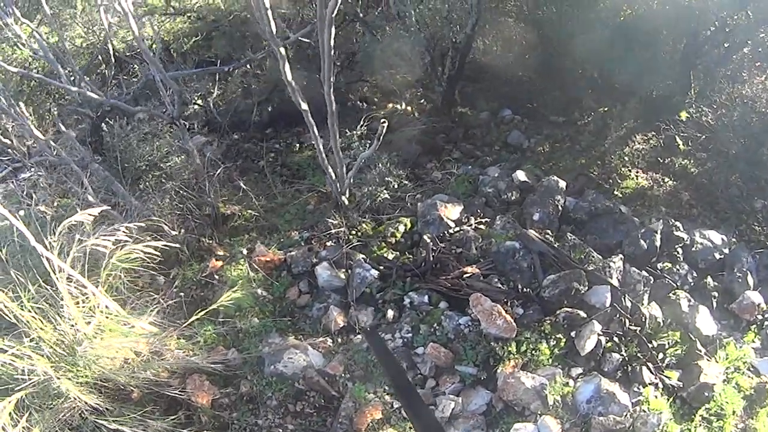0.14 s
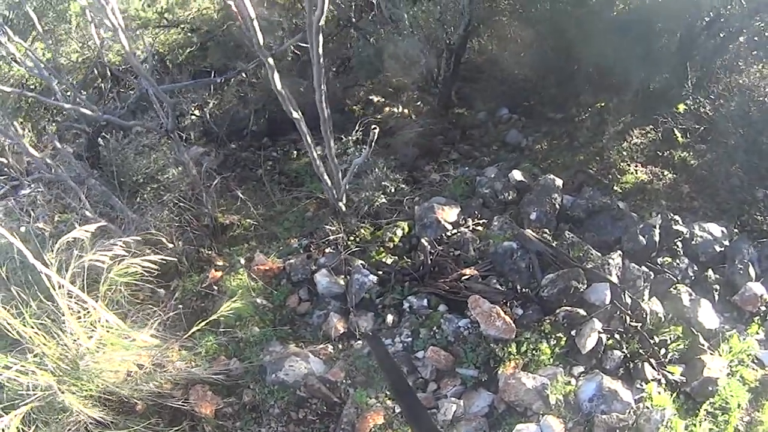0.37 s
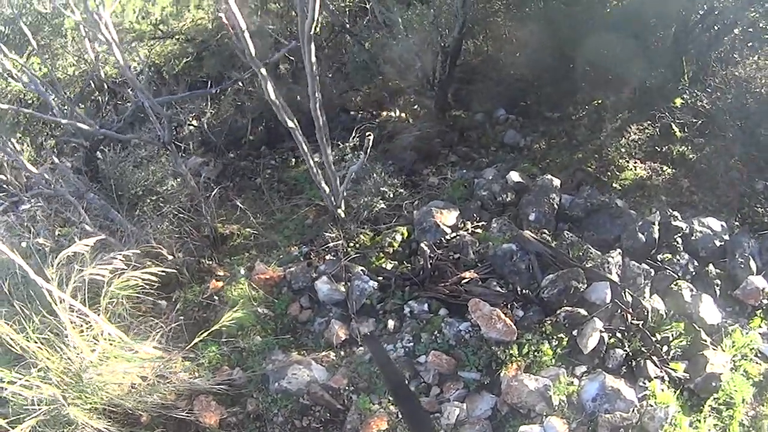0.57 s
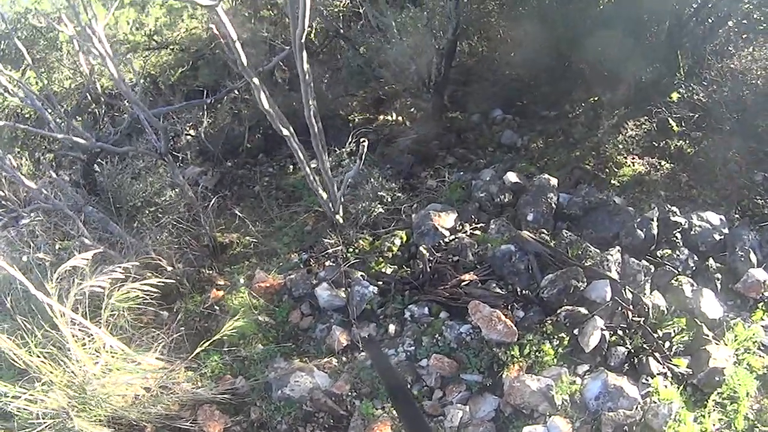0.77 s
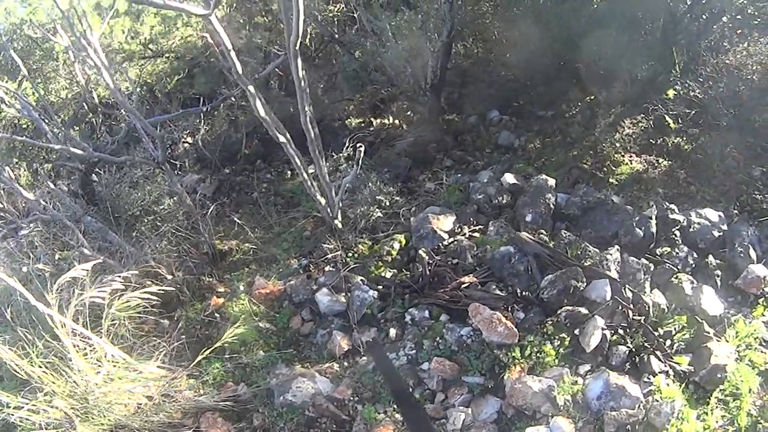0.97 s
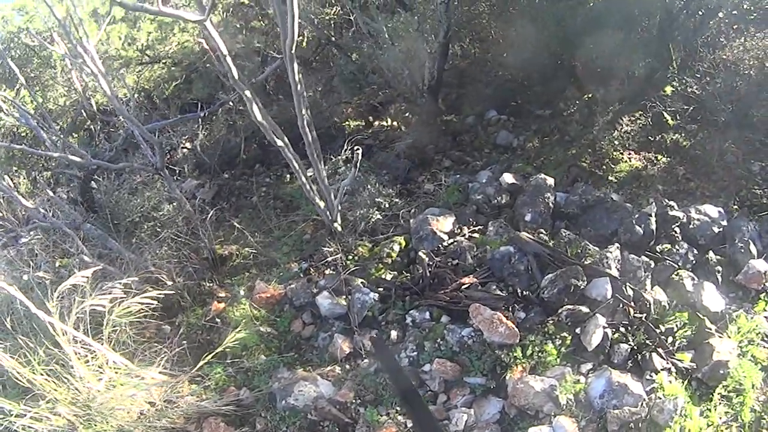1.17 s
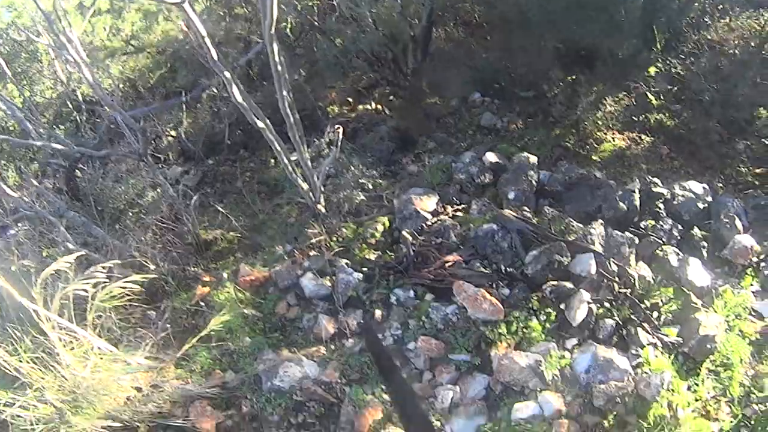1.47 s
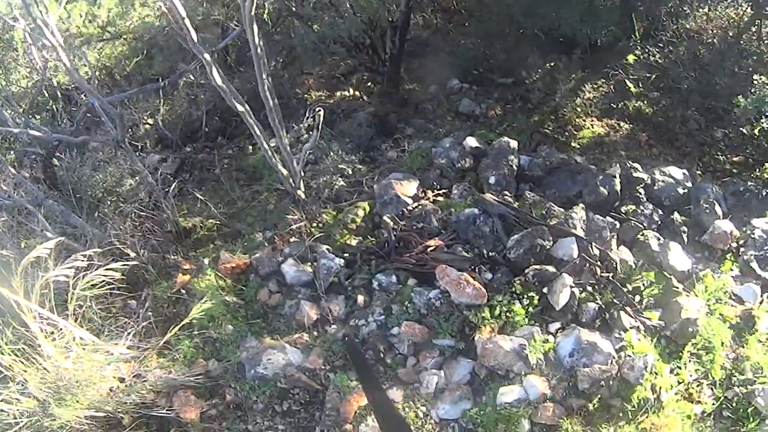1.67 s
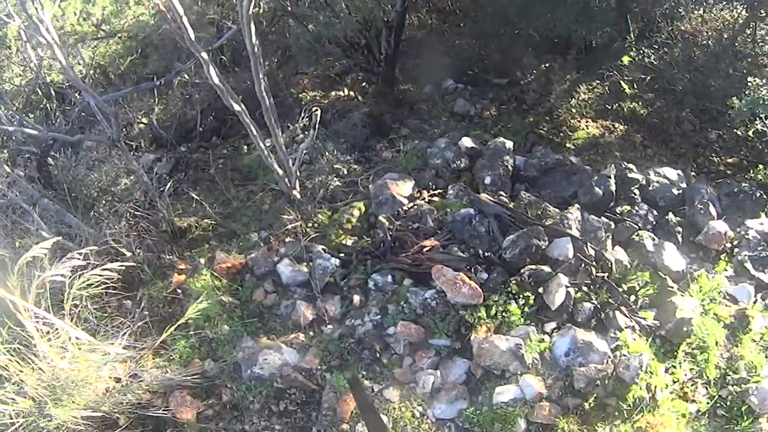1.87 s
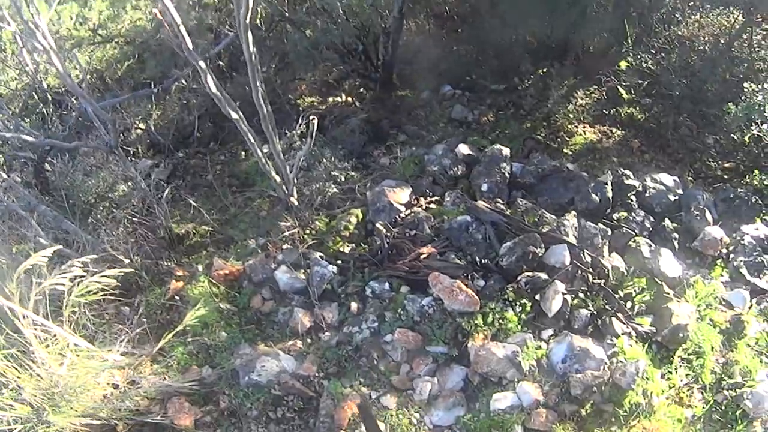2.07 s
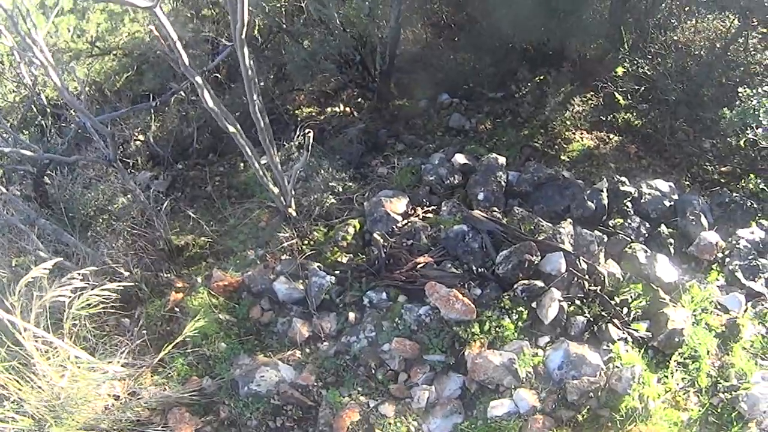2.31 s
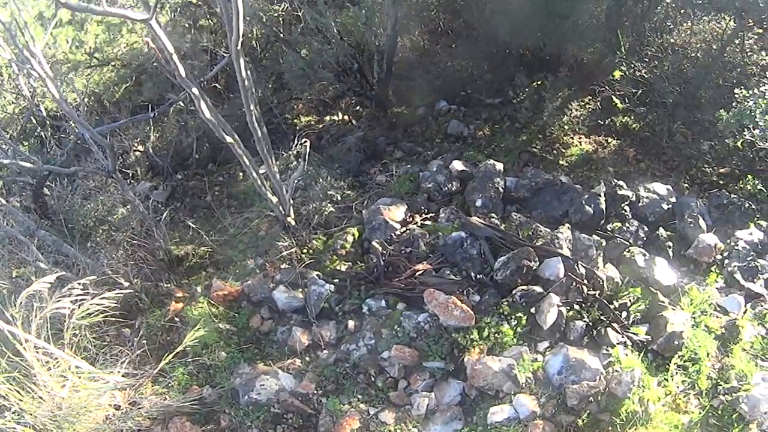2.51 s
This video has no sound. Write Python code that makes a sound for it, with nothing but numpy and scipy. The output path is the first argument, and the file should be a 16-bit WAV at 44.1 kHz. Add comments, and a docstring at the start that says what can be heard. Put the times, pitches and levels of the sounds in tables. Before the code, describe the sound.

Three short, raspy squeals from a young wild boar moving through dry brush outdoors.

```python
"""Young wild boar in dry brush

A few metres away on a stony slope, a young boar squeals three times: jittery harmonics and rasp,
shaped by its throat. Each squeal sags in pitch; two break into a higher, rasping register.
As it moves, twigs snap, stones clack, dry leaves rustle and two hoof steps thud softly.
Rocks and bushes scatter short reflections, over a quiet outdoor hush."""
import sys
import numpy as np
from scipy import signal
from scipy.fft import rfft, irfft
from scipy.io import wavfile

SR = 44100
rng = np.random.default_rng(int(sys.argv[2]) if len(sys.argv) > 2 else 0)


def wrap_up_sound(samples):
    """Save the sound to the file named by the first command line argument, as 16-bit audio."""
    columns = np.atleast_2d(samples).T
    # keep every value between -1 and 1, then stretch to whole-number steps
    tamed = np.clip(columns, -1, 1)
    steps = np.round(tamed * 32767).astype(np.int16)
    wavfile.write(sys.argv[1], SR, steps)


N = 116865


def amp(db):
    """Decibels to linear gain."""
    return 10 ** (np.asarray(db) / 20)


def unit(x):
    """Scales to rms 1."""
    return x / np.sqrt(np.mean(x ** 2) + 1e-20)


def read(points, hz):
    """Reads a table on a log-frequency axis."""
    table_hz, value = np.transpose(points)
    return np.interp(np.log(hz + 1), np.log(table_hz + 1), value)


def add(mix, start_s, sound):
    """Drops a sound into the mix at its cue."""
    part = mix[max(round(start_s * SR), 0):][:len(sound)]
    part += sound[:len(part)]


def noise_band(size, centre_hz, width_hz):
    """Noise through one steep resonance, at rms 1."""
    hz = np.fft.rfftfreq(SR, 1 / SR)
    rolloff = 1 + (2 * (hz - centre_hz) / width_hz) ** 4
    return unit(irfft(rfft(rng.standard_normal(SR)) / rolloff)[:size])


def colour(points, pitch=1):
    """An EQ curve as gains of unit power, transposed by a pitch ratio."""
    hz = abs(np.fft.fftfreq(2048, 1 / SR))
    return unit(amp(read(points, hz / pitch)))


def click(gain):
    """The tightest click with this spectrum: a minimum-phase impulse."""
    log_spectrum = np.conj(signal.hilbert(np.log(gain + 1e-9)))
    return np.fft.ifft(np.exp(log_spectrum)).real[:len(gain) // 2]


def hush():
    """A steady bed of outdoor air, wide in the mids and nearly mono in the bass."""
    # tone of the air (frequency [Hz], level [dB])
    air_eq = [(15, -17), (25, -3.5), (149, -4.5), (444, -2.5), (651, -4.5), (759, -5.5), (819, -8),
              (1140, -6), (1550, -8), (1670, -7.5), (3240, -12.5), (3590, -11.5), (5530, -13), (8750, -14),
              (11000, -18.5), (14300, -80), (22000, -120)]
    # left-right likeness (frequency [Hz], correlation [-1 to 1])
    likeness = [(30, 1), (80, 0.67), (170, 0.56), (350, -.25), (700, 0), (1500, 0), (4000, 0),
                (10000, 0.38)]
    hz = np.fft.rfftfreq(N, 1 / SR)
    left, independent = rfft(rng.standard_normal((2, N))) * amp(read(air_eq, hz))
    correlation = np.clip(read(likeness, hz), -1, 1)
    right = correlation * left + np.sqrt(1 - correlation ** 2) * independent
    return amp(-58.5) * unit(irfft(np.array([left, right]), N))


def rustle():
    """Dry leaves: tiny clicks of uneven size and a noise wash, swelling as the animal moves."""
    # fader ride of the rustle (time [s], level [dB])
    ride = [(0, -46.5), (.1, -49), (.16, -48), (.26, -48.5), (.34, -52.5), (.43, -56.5), (.47, -47),
            (.56, -43.5), (.62, -51), (.69, -54.5), (.79, -55.5), (.87, -53), (.97, -49), (1.04, -53.5),
            (1.09, -49.5), (1.21, -53.5), (1.3, -59), (1.4, -63), (1.47, -52.5), (1.68, -60),
            (1.772, -58.5), (1.86, -53), (1.97, -67), (2.05, -62.5), (2.11, -54), (2.17, -60.5),
            (2.42, -61), (2.55, -59), (2.65, -71)]
    # tone of the leaves (frequency [Hz], level [dB])
    leaf_eq = [(290, -36), (500, -35.5), (599, -14.5), (700, -41.5), (817, -7.5), (918, -23), (1250, -9.5),
               (1340, -12.5), (2390, -12.5), (2720, -1), (2900, 1), (4120, -7), (4570, -1.5), (6730, -8),
               (8060, -3.5), (9920, -11), (11000, -21), (14300, -82), (22000, -120)]
    grains_per_s, spread_db, wash_db = 1800, 3.5, 0.5
    grains = (rng.random(N) < grains_per_s / SR) * rng.choice([-1, 1], N)
    sizes = amp(spread_db * np.minimum(rng.exponential(1, N), 4.5))
    drive = unit(grains * sizes) + amp(wash_db) * rng.standard_normal(N)
    leaves = unit(signal.fftconvolve(drive, click(colour(leaf_eq)))[:N])
    return leaves * amp(np.interp(np.arange(N) / SR, *np.transpose(ride)))


def thud(level_db):
    """A hoof presses into the soil: a short, dull puff."""
    attack_s = 0.0013
    age = np.arange(SR // 25) / SR / attack_s
    return amp(level_db) * age * np.exp(1 - age) * noise_band(len(age), centre_hz=530, width_hz=690)


def crack(knock_db, ring_db, snap_db, splinter_s, pitch):
    """A twig or stone: one impact and brief splintering excite a dull knock, a ring and a bright snap."""
    # tones of the three layers (frequency [Hz], level [dB])
    knock_eq = [(100, -21), (500, -21), (750, -11.5), (1000, -0.5), (1450, 3.5), (2000, -3.5), (3000, 2),
                (6000, -25)]
    ring_eq = [(500, -87), (1800, -20), (2350, -19), (2750, 4.5), (3000, 9), (3350, -2), (4000, -11),
               (6000, -21), (11000, -67)]
    snap_eq = [(500, -68), (1700, -38), (2300, -31), (3100, -2.5), (4000, -4), (4900, 5.5), (6300, -1.5),
               (8200, -2.5), (10000, -12.5), (12000, -26)]
    layers = [(knock_db, knock_eq), (ring_db, ring_eq), (snap_db, snap_eq)]
    gain = np.sqrt(sum((amp(db) * colour(eq, pitch)) ** 2 for db, eq in layers))
    age = np.arange(SR // 40) / SR / splinter_s
    blow = rng.standard_normal(len(age)) * np.sqrt(age) * np.exp(-age)
    blow *= amp(1) / np.linalg.norm(blow)  # splinters carry 1 dB more energy than the impact
    blow[0] = 1  # the impact
    return signal.fftconvolve(blow / np.linalg.norm(blow), click(gain))


def brush():
    """The boar's movement: cracking twigs and stones, hoof steps and leaves."""
    # twig and stone hits (time [s], knock [dB], ring [dB], snap [dB], splinter decay [s], pitch [ratio])
    cracks = [(.0045, -14.5, -28, -31, 0.0032, 0.89), (0.0102, -32, -18.5, -23.5, 0.0027, 1.07),
              (0.0396, -27, -18.5, -24.5, 0.0012, 1.01), (0.072, -25, -18.5, -25, 0.0023, .92),
              (.1163, -21, -13, -7, 0.0018, 0.95), (.128, -19, -13, 1, 0.0014, 1.016),
              (.134, -11, -16, -12, 0.0025, 0.97), (.140, -26, -5.5, -9, 0.00091, 1.08),
              (0.1623, -49, -23, -16.5, .002, 1.36), (0.2363, -31, -14, -21, 0.0014, 1.05),
              (0.2463, -29, -18, -32, .001, 1.01), (0.2648, -37, -21, -37, 0.0008, 1.04),
              (0.271, -42, -30, -24, .001, 0.85), (.298, -36, -26, -21, 0.0011, 0.95),
              (0.3512, -23.5, -35, -31, 0.00074, 1.1), (.38, -30, -19, -25, 0.00041, 0.76),
              (0.3824, -14.5, -13, -28, 0.001, 1.013), (0.4195, -50, -18, -14, 0.00071, 0.92),
              (0.449, -57, -24, -18, 0.0042, 1.06), (0.4597, -33, -17.5, -19.5, 0.00056, 1.1),
              (.488, -22, -24, -24, 0.0019, 0.96), (.512, -54, -29, -16.5, 0.0027, 0.96),
              (.551, -47, -20, -16.5, 0.0017, 0.99), (.576, -42, -36, -16.5, 0.00039, 1.13),
              (0.582, -40, -41, -22, 0.00096, 0.99), (.599, -28, -8.5, -33, 0.0013, 1),
              (.619, -28, -43, -40, 0.0017, 0.97), (.707, -38, -20.5, -26, 0.0012, 0.92),
              (0.7137, -47, -38, -11.5, 0.0016, 1.18), (.743, -40, -21, -44, 0.0026, 1.11),
              (.7496, -29.5, -19.5, -28, 0.00075, 0.99), (.768, -34, -42, -42, 0.0015, 0.57),
              (0.8113, -38, -27, -24.5, 0.0018, 1.17), (0.8536, -34, -25, -22, 0.0027, 0.96),
              (0.863, -26, -18.5, -20.5, .002, 1.03), (0.9619, -24, -17.5, -23, 0.0013, 0.97),
              (.992, -21, -28, -28, .001, 0.9), (.9993, -21, -15.5, -25, 0.00091, 0.98),
              (1.171, -29, -25, -45, 0.00071, 0.81), (1.1887, -37, -46, -23, 0.00065, 1.5),
              (1.209, -34, -31, -22, 0.00046, 1.02), (1.251, -22, -22.5, -37, 0.002, 1),
              (1.3534, -30, -20.5, -28.5, 0.001, 0.98), (1.637, -28, -24, -29, 0.0015, 0.96),
              (1.7003, -26.5, -26, -53, 0.0014, 1.01), (1.804, -31, -29, -31, 0.0023, 0.98),
              (1.832, -27.5, -39, -34, 0.00083, 0.96), (1.911, -31.5, -22.5, -41, 0.0014, 0.98),
              (2.0817, -18, -14.5, -47, 0.00052, 0.98), (2.086, -38, -39, -25.5, 0.0019, 1),
              (2.095, -33, -19, -16.5, 0.0012, 1), (2.1055, -38, -45, -23.5, 0.0014, 0.96),
              (2.1967, -29, -23, -28, 0.00052, 1.03), (2.261, -50, -52, -30, .001, 1.25),
              (2.415, -43, -32, -35, 0.0016, 1.07), (2.4695, -50, -51, -30.5, .0015, 0.91),
              (2.5448, -53, -40, -31.5, 0.0019, 0.92)]
    # soft hoof steps (time [s], level [dB])
    steps = [(0.1247, -45), (1.0043, -44)]
    hits = np.zeros(N)
    for start_s, *settings in cracks:
        add(hits, start_s, crack(*settings))
    for start_s, level_db in steps:
        add(hits, start_s, thud(level_db))
    return hits + rustle()


def squeal(curve, shut_ratio):
    """Jittery harmonics and half-pitch lines, shaped by the throat, with a noisy rasp on top."""
    # throat resonances with the mouth open (frequency [Hz], level [dB])
    throat = [(250, -41), (420, -24), (600, -9), (850, -7), (1050, -4.5), (1320, 0.5), (1550, -3),
              (1750, -1.5), (1930, 3.5), (2080, -9), (2300, -19), (2600, -19.5), (3200, -21), (5000, -35),
              (8000, -57)]
    jitter, shimmer, wobble_hz = 0.01, 0.18, 158  # rms wobble of pitch and level, and its bandwidth
    opening_s, fade_s = 0.026, 0.0029
    times, *columns = np.transpose(curve)
    t = np.arange(times[0], times[-1], 1 / SR)
    hz, level_db, tilt_db, half_db, rasp_db = (np.interp(t, times, column) for column in columns)
    hz = hz * (1 + jitter * noise_band(len(t), 0, 2 * wobble_hz))
    mouth = np.interp(t - t[0], [0, opening_s], [shut_ratio, 1])  # resonances rise as the mouth opens
    multiple = np.arange(1, 21)[:, None] / 2
    is_half = multiple % 1 > 0
    gains = amp(read(throat, multiple * hz / mouth) + tilt_db * np.log2(multiple) + half_db * is_half)
    gains /= np.sqrt((gains ** 2).sum(0) / 2)
    cycles = multiple * np.cumsum(hz) / SR + rng.random(multiple.shape)
    voice = (gains * np.cos(2 * np.pi * cycles)).sum(0)
    voice *= 1 + shimmer * noise_band(len(t), 0, 2 * wobble_hz)
    voice += amp(rasp_db) * noise_band(len(t), centre_hz=1400, width_hz=470)
    fade = np.clip(np.minimum(t - t[0], t[-1] - t) / fade_s, 0, 1)
    return times[0], voice * amp(level_db) * fade


def boar():
    """Three sagging squeals; the first and last break into the upper register."""
    # one curve per squeal
    # (time [s], pitch [Hz], level [dB], tilt [dB/octave], half-pitch lines [dB], rasp [dB])
    squeals = [
        [(.872, 583, -49, 1, -18, -13), (.886, 608, -43, 1.5, -16, -0.5), (.905, 646, -40, -1, -24, -19),
         (.918, 636, -41, 3, -3, -17), (.928, 625, -43.5, -5, -18, -10), (.942, 638, -42, 7, -17, -24),
         (.953, 604, -58, -17, -20, -13), (.972, 598, -51.5, -17, -20, -8)],
        [(1.418, 685, -63, 10, -38, -10), (1.432, 691, -40, 2, 4.5, -10), (1.449, 662, -43, 1.5, 0, -11),
         (1.463, 631, -45, -0.5, 2, -7), (1.478, 595, -48, -1, -19, -22), (1.497, 573, -48, -4, -18, -20),
         (1.519, 606, -49, -8, -25, -24), (1.532, 580, -47, -5, -23, -24), (1.548, 520, -60, -16, -20, -17)],
        [(2.09, 698, -46, 21, -24, -22), (2.105, 673, -50.5, -1.5, -26, -24),
         (2.123, 645, -42.5, -2.5, -28, -35), (2.138, 589, -41, -0.5, -18, -17),
         (2.146, 563, -50.5, -24, -32, -22), (2.175, 525, -56.5, -22, -19, -23)],
    ]
    # register breaks, same columns
    breaks = [
        [(.936, 975, -51, -7, -23, 3), (.944, 908, -47.5, -10, -22, 4), (.958, 874, -46, -6, -17, 6.5),
         (.969, 840, -51.5, 2, -20, 0), (.992, 830, -44.5, -1, -22, -6), (1.003, 800, -80, 2, -17, -6)],
        [(2.15, 728, -57, 3, -25, 7), (2.16, 741, -48.5, -6, -28, 7), (2.176, 783.5, -46, -15, -32, 3),
         (2.19, 788, -47, -5, -25, -5), (2.204, 770, -47, 10, -31, -26), (2.211, 725, -52, 2, -25, -8)],
    ]
    voice = np.zeros(N)
    for curve in squeals:
        add(voice, *squeal(curve, shut_ratio=0.823))
    for curve in breaks:
        add(voice, *squeal(curve, shut_ratio=0.96))
    return voice


def mic_ports(mono):
    """The left microphone port hears the direct sound slightly ahead of the right."""
    # left over right (frequency [Hz], phase lead [rad])
    port_lead = [(100, 0.38), (600, 1.16), (1200, 1.2), (2200, 0.76), (4000, 0.39), (7000, 0.39),
                 (11000, 0.6)]
    lead = read(port_lead, np.fft.rfftfreq(N, 1 / SR))
    return irfft(rfft(mono) * np.exp(.5j * np.array([lead, -lead])), N)


def slope(direct, wet_db, width):
    """Direct sound plus sparse, quickly dying reflections from rocks and bushes."""
    # decay of the scatter (frequency [Hz], time to fall 60 dB [s])
    decay = [(300, 0.26), (1200, 0.49), (3000, 0.24), (9000, 0.16)]
    size, echoes_per_s, predelay_s = SR // 2, 3000, .003
    taps = rng.standard_normal((2, size)) * (rng.random((2, size)) < echoes_per_s / SR)
    taps *= np.arange(size) > predelay_s * SR
    hz, t, spectra = signal.stft(taps, SR, nperseg=256)
    tail = signal.istft(spectra * amp(-60 * t / read(decay, hz)[:, None]), SR, nperseg=256)[1]
    tail /= np.linalg.norm(tail[0])
    mid, side = signal.fftconvolve(direct.mean(0)[None], tail, axes=1)[:, :N]
    return direct + amp(wet_db) * np.array([mid + width * side, mid - width * side])


def scene():
    """The boar and the brush it moves through, heard across the slope over the hush."""
    voice = slope(mic_ports(boar()), wet_db=-14.5, width=0.85)
    movement = slope(mic_ports(brush()), wet_db=-12.5, width=0.64)
    return hush() + movement + voice


def record(dry):
    """The camera's band limit: a steep low-pass on the top end."""
    cutoff_hz = 11250
    lowpass = signal.firwin(255, cutoff_hz, window=("kaiser", 8), fs=SR)
    return signal.oaconvolve(dry, lowpass[None], "same")


dry = scene()
out = record(dry)
wrap_up_sound(out)
```